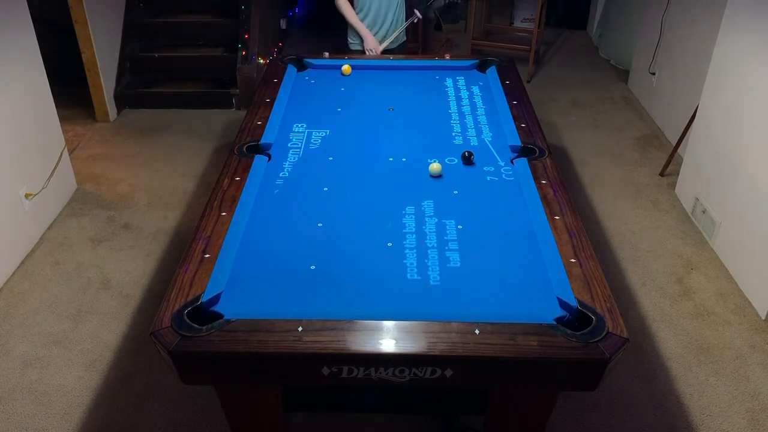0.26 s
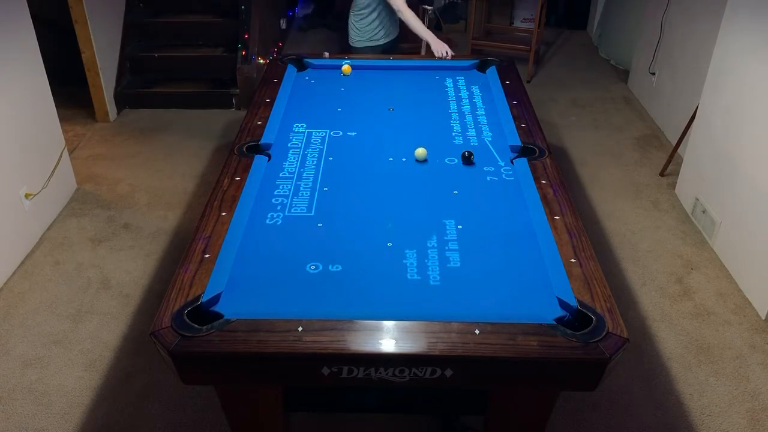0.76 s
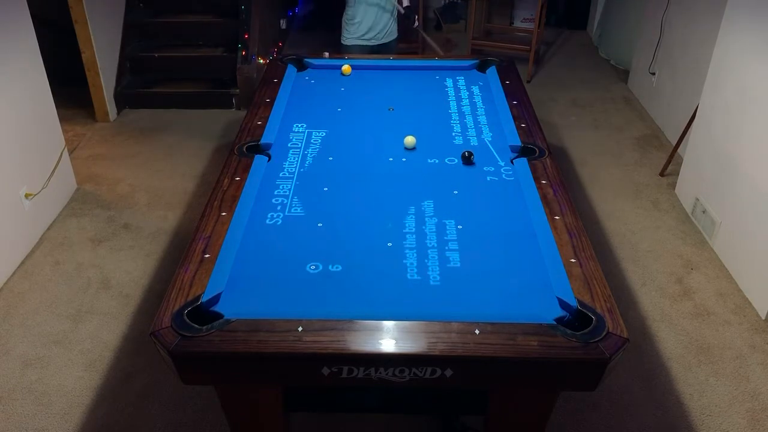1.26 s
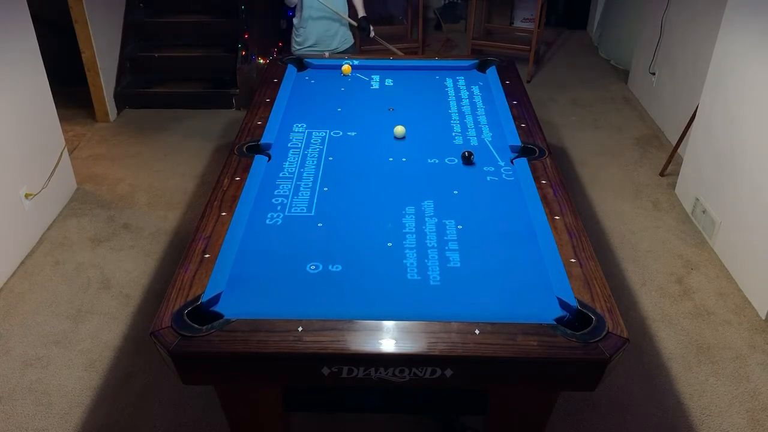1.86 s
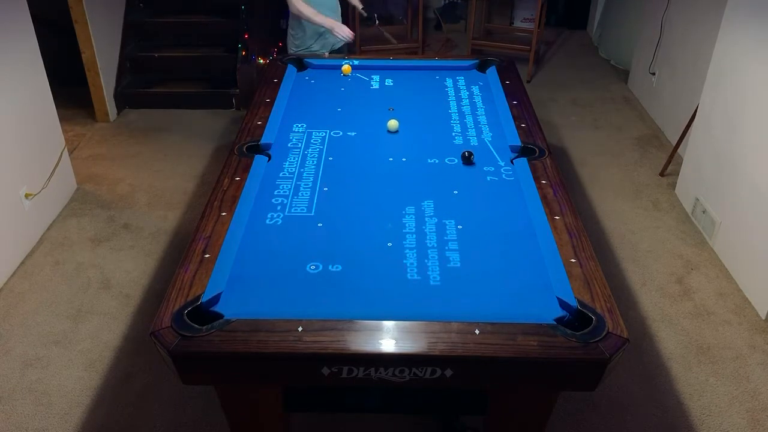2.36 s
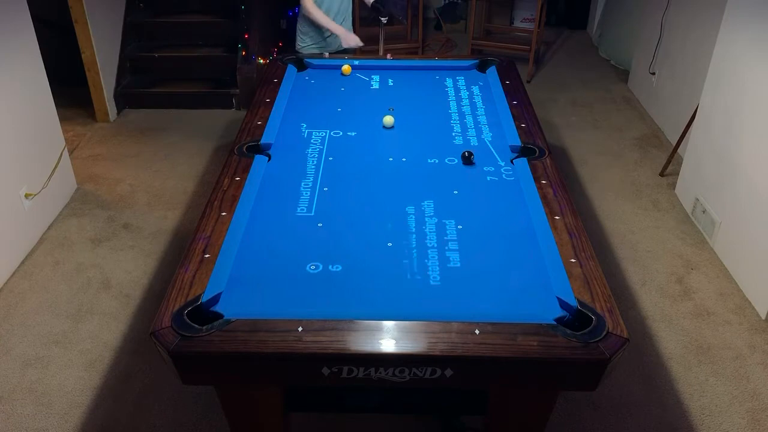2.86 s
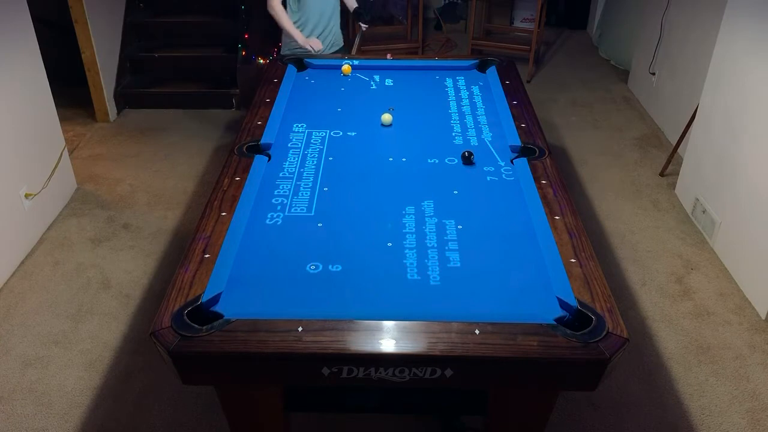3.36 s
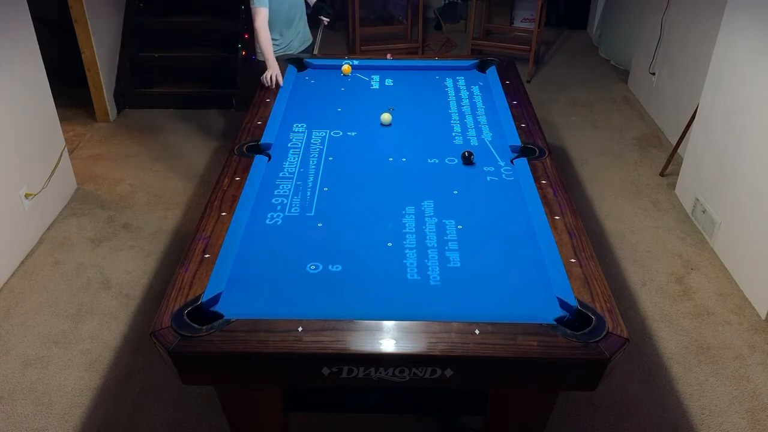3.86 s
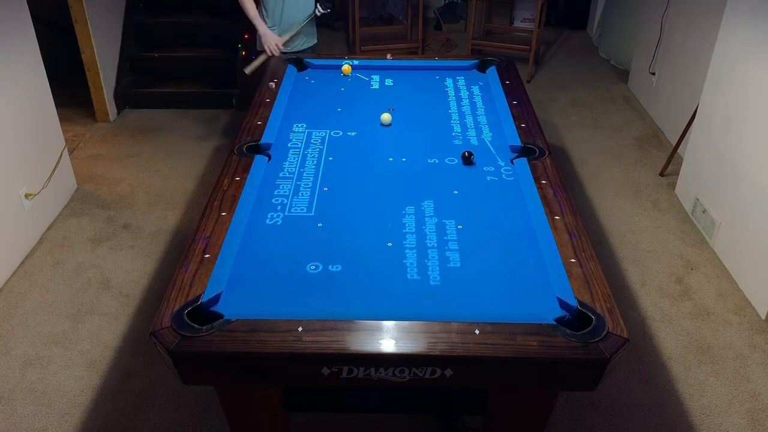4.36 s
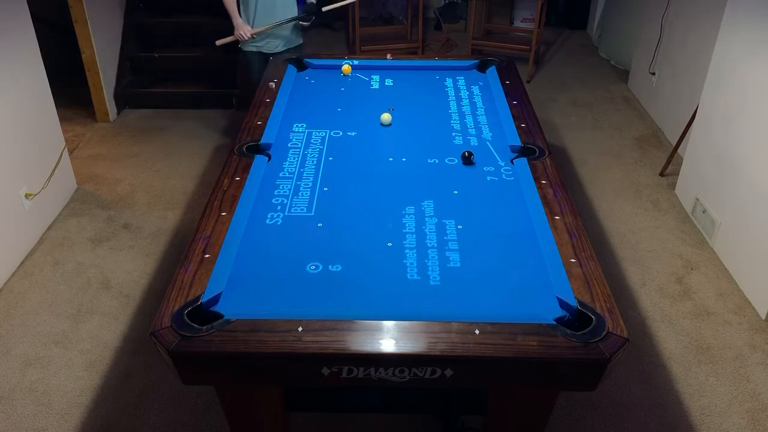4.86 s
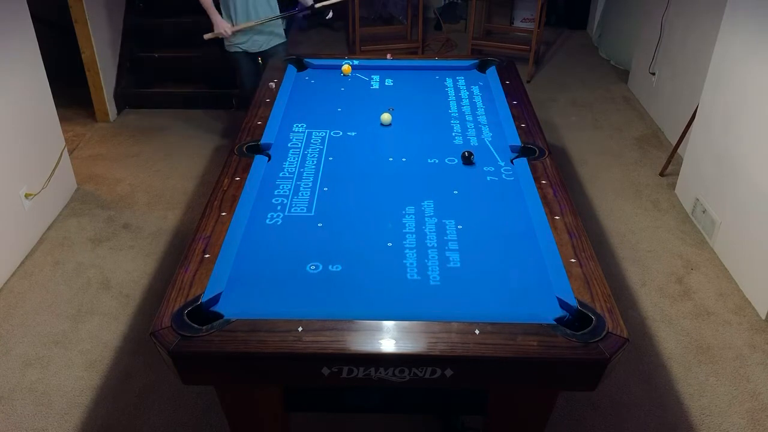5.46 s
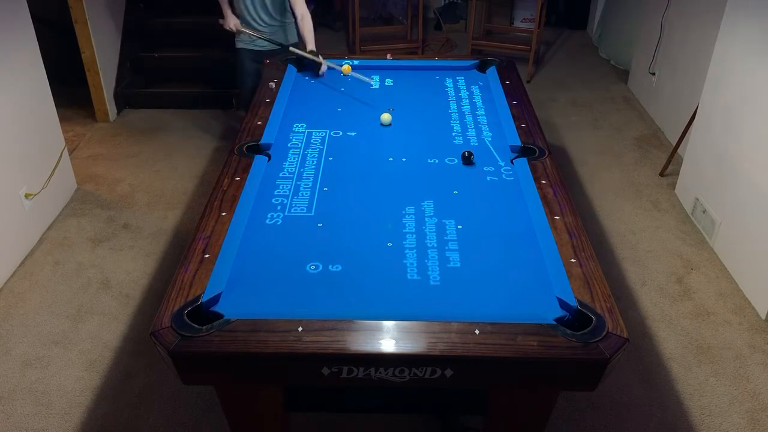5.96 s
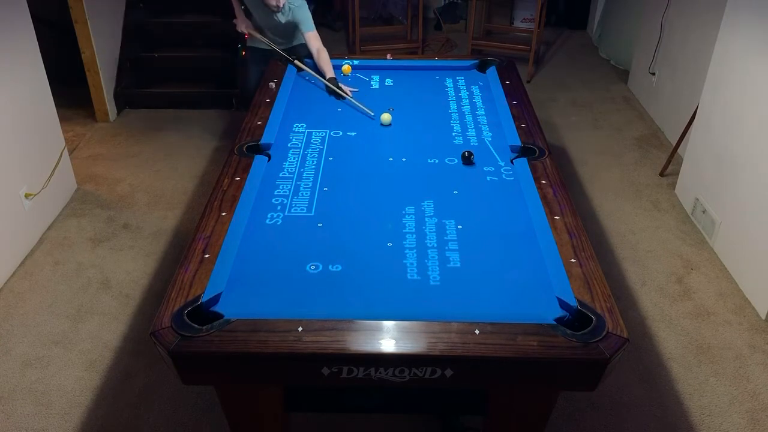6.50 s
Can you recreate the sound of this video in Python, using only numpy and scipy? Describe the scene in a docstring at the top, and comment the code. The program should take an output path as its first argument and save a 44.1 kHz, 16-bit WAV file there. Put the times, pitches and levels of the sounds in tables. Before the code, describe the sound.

A low, soft fan hum fills a small quiet room throughout. At 0 s a sharp clack opens a rapid, uneven clatter of a ball in a pocket until about 0.35 s, with hollow wooden booms and a wavering low drone; rumbling fades by 0.5 s. A padded footfall comes at 1.15 s, and low rolling swells gently from 1.3 to 1.9 s. Faint gritty chalk strokes scratch between 1.35 and 2.2 s, with a dull thud near 2.0 s and a step at 2.1 s. Chalk taps the wooden rail at 2.58 s. Slight cloth rustles follow, then steps at 3.8 s. A hand scuffs at 4.1 s before a cluster of heavy, muffled knocks from 4.28 to 4.5 s. Soft steps and small knocks lead to 5.7 s. From 6.17 s hand and arm thump onto the table, a cue hisses barely audibly, and a small tap ends it near 6.65 s.

```python
"""A quiet basement room with a pool table: a ball clatters into a pocket, rocks and rumbles on to a thud.
The player chalks his cue, sets the chalk on the rail, walks round, knocks about at the corner pocket
and leans on the table for the next shot, while a fan hums throughout.
Impacts are sums of damped modes with bursts of decaying noise; friction, rolling and air are coloured
noise; the rocking ball's drone and the fan add tones."""
import sys
import numpy as np
from scipy import signal
from scipy.fft import rfft, irfft, next_fast_len
from scipy.io import wavfile
from scipy.ndimage import uniform_filter1d

SR = 44100
rng = np.random.default_rng(int(sys.argv[2]) if len(sys.argv) > 2 else 0)


def unload_wav(signal):
    """Save mono or channel-first audio to the path in sys.argv[1] as 16-bit WAV at rate SR, clipped to [-1, 1]."""
    wavfile.write(
        sys.argv[1],
        SR,
        np.round(np.clip(np.atleast_2d(signal).T, -1, 1) * 32767).astype(np.int16),
    )


N = 296793
RING_TIME = np.arange(SR) / SR  # one second of time [s]

# Knocks on pocket and cabinet: (time [s], force level [dB], boom level [dB], ring centre [Hz],
# hardness corner [Hz], contacts [count, always 1])
KNOCK_CONTACTS = [(0.0, -23, -49, 705, 4935, 1), (0.013, -30, -14, 242, 1290, 1),
                  (0.034, -28, -21, 433, 1490, 1), (0.134, -34, -14.5, 810, 5560, 1),
                  (0.157, -25.5, -33.5, 628, 800, 1), (0.191, -29, -18, 592, 1300, 1),
                  (0.201, -33.5, -22, 567, 2700, 1), (0.231, -32.5, -29, 668, 700, 1),
                  (0.269, -39.5, -22, 502, 3570, 1), (0.297, -48.5, -29.5, 449, 3000, 1),
                  (0.317, -48.5, -37.5, 500, 3190, 1), (0.345, -42.5, -21.5, 490, 1100, 1),
                  (1.968, -34, -30.5, 560, 1230, 1), (1.987, -23, -21, 241, 620, 1),
                  (2.016, -29, -39, 181, 222, 1), (2.056, -34.5, -39, 188, 244, 1),
                  (3.897, -43.5, -57, 760, 620, 1), (4.109, -35, -41, 720, 700, 1),
                  (4.165, -32.5, -36.5, 338, 450, 1), (4.282, -21, -48, 770, 720, 1),
                  (4.292, -20.5, -21.5, 384, 560, 1), (4.328, -23.5, -32, 268.5, 307, 1),
                  (4.369, -24, -28.5, 427, 446, 1), (4.416, -25.5, -30, 386, 481, 1),
                  (4.431, -24.5, -22.5, 393, 336, 1), (4.465, -30.5, -29, 283, 803, 1),
                  (4.512, -32, -27.5, 427, 605, 1), (4.961, -36.5, -42, 284, 707, 1),
                  (5.665, -38.5, -24, 550, 470, 1), (5.703, -37.5, -36, 313, 350, 1)]
# Modes of the heavy frame: (frequency [Hz], relative level [dB], t60 [s])
FRAME_MODES = [(53.4, -14.5, 0.83), (65.7, -3.5, 0.68), (85.1, 9.5, 0.2), (102.6, -1.5, 0.36),
               (116.07, 5, 0.41), (137.9, 1.5, 0.21)]
# Modes of the pocket rim: (frequency [Hz], relative level [dB], t60 [s])
RIM_MODES = [(667, 15, 0.23), (719, -0.5, 0.067), (783, -2.5, 0.23), (908, -11, 0.12), (1007, -3, 0.2),
             (1080, 5.5, 0.17), (1226, -4, 0.21), (1432, -18, 0.16), (1510, -8, 0.25), (1634, -2.5, 0.25),
             (1690, -11.5, 0.32), (1893, -5, 0.31), (2070, -12.5, 0.2), (2190, -17, 0.37),
             (2300, -16, 0.24), (2660, -21.5, 0.2), (2870, -11.5, 0.31), (3220, -9.5, 0.24),
             (3380, -21, 0.2), (4230, -17, .25), (4520, -11.5, 0.31), (5000, -21.5, .22), (6050, -18, .2),
             (6700, -23.5, .2)]
# Likeness of the two channels: (frequency [Hz], correlation [-1 to 1])
CHANNEL_CORRELATION = [(60, 1), (150, 0.98), (300, 0.65), (700, 0.2), (1080, 0.42), (1600, -0.42),
                       (2300, 0.2), (6000, -0.23), (15000, 1)]


def amp(db):
    """Level definition: decibels to amplitude gain."""
    return 10 ** (np.asarray(db) / 20)


def unit(x):
    """Normalisation to an rms of 1."""
    return x / np.sqrt(np.mean(x ** 2) + 1e-20)


def read(points, hz):
    """Interpolation of a table over frequency, linear on a log axis."""
    f, value = np.transpose(points)
    return np.interp(np.log(hz + 1), np.log(f + 1), value)


def add(mix, s, sound):
    """Superposition: mixes a sound in at time s, in place."""
    part = mix[:, max(round(s * SR), 0):][:, :sound.shape[-1]]
    part += sound[..., :part.shape[1]]


def pitches(modes):
    """Modal frequencies, as a column."""
    return np.array(modes)[:, :1]


def hump_db(hz, centre_hz, octaves):
    """Broad spectral peak with nearly straight skirts on a log axis."""
    away = np.hypot(1, np.log2((hz + 1) / centre_hz) / octaves)
    return -20 * np.log10(away) - 6 * (away - 1)


def peaks_db(hz, peaks):
    """Resonant lift (Hz, width Hz, dB) of a spectrum; where peaks overlap the greatest lift counts."""
    return np.max([db / (1 + (2 * (hz - at) / width) ** 2) for at, width, db in peaks], axis=0)


def contact_db(hz, corner_hz, steepness):
    """Contact-time low-pass: a softer, longer contact excites less treble."""
    return -10 * np.log10(1 + (hz / corner_hz) ** steepness)


def envelope(length_s, attack_s, release_t60):
    """Linear attack, and exponential decay from length_s on."""
    return np.minimum(RING_TIME / attack_s, 1) * amp(-60 * np.maximum(RING_TIME - length_s, 0) / release_t60)


def noise(field_db, length, size=512):
    """Diffuse field: two partly correlated noises whose level is field_db(time, Hz)."""
    hop = size // 4
    hz = np.fft.rfftfreq(size, 1 / SR)
    t = np.arange(length // hop + 5)[:, None] * hop / SR
    shape = (2, len(t), len(hz))
    first, second = rng.standard_normal(shape) + 1j * rng.standard_normal(shape)
    alike = np.clip(read(CHANNEL_CORRELATION, hz), -1, 1)
    left_right = np.array([first, alike * first + np.sqrt(1 - alike ** 2) * second])
    spectrum = left_right * amp(field_db(t, hz))
    sound = signal.istft(spectrum, nperseg=size, noverlap=size - hop, time_axis=1, freq_axis=2)[1]
    return sound[:, :length]


def patches(t, hz):
    """Random modulation: blotches over time and frequency, rms 1."""
    over_time = uniform_filter1d(rng.standard_normal((len(t), len(hz))), size=5, axis=0)
    return unit(uniform_filter1d(over_time, size=12, axis=1))


def wander(length, span_s):
    """Low-passed noise: a smooth random curve of rms 1 that changes within span_s."""
    return unit(signal.oaconvolve(rng.standard_normal(length), np.hanning(round(span_s * SR)), "same"))


def burst(colour_db, early, early_s, rise_s, damping=0, uneven_db=4, uneven_above_hz=1500):
    """Reverberant decay: strong first arrivals, then an uneven noise tail, each band dying at its own rate."""
    # Room decay: (frequency [Hz], t60 without extra damping [s])
    room_t60 = [(60, 0.76), (250, 0.52), (1000, 0.3), (3000, 0.55), (7000, 0.33), (15000, 0.4)]
    time = RING_TIME[:SR * 2 // 3]

    def field_db(t, hz):
        uneven = uneven_db * rng.standard_normal(len(hz)) * hz / (hz + uneven_above_hz)
        return colour_db(hz) + uneven - t * (60 / read(room_t60, hz) + damping)

    tail = noise(field_db, len(time), size=1024)
    tail *= (1 + early * np.exp(-time / early_s)) * np.tanh(time / rise_s) ** 2
    return tail / np.sqrt(np.mean(tail[:, :SR // 40] ** 2))  # rms 1 over the first 25 ms


def ring(modes, rise_s, weight_db=0):
    """Modal superposition: damped sines, less in phase between channels where correlation is lower."""
    hz, db, t60 = np.transpose(modes)[:, :, None]
    order = np.arange(len(hz))[:, None]
    size = amp(db + weight_db)
    skew = np.arccos(np.clip(read(CHANNEL_CORRELATION, hz), -1, 1)) * (-1) ** order / 2
    sign = (-1) ** (order // 2)
    t = RING_TIME[:SR // 2]
    decay = sign * size / np.linalg.norm(size) * amp(-60 * t / t60) * np.tanh(t / rise_s) ** 2
    return 2 * np.array([(decay * np.sin(2 * np.pi * hz * t + side * skew)).sum(0) for side in (1, -1)])


def rub(colour_db, grain_db, length=SR, patchy_db=0):
    """Stick-slip friction or rolling: evened-out coloured noise, its level roughened by grain_db."""
    sound = noise(lambda t, hz: colour_db(hz) + patchy_db * patches(t, hz), length, size=1024)
    sound /= np.sqrt(uniform_filter1d((sound ** 2).mean(0), size=SR // 10) + 1e-20)
    return sound * amp(grain_db * wander(length, span_s=0.012))


def contacts(rows):
    """Contact hardness: the harder the contact, the more it clacks for its force."""
    clack_db, db_per_octave, middle_hz = -8.5, 3.5, 690
    for s, force_db, boom_db, centre_hz, hard_hz, _ in rows:
        clack = force_db + clack_db + db_per_octave * np.log2(hard_hz / middle_hz)
        yield s, force_db, boom_db, clack, centre_hz, hard_hz


def strike_spot(modes):
    """Modal participation: the spot struck favours some modes at random, in dB."""
    return 4 * rng.standard_normal((len(modes), 1))


def blows(rows, modes, clack_modes, boom_hz, ring_octaves, steepness, early, clack_share_db):
    """Impact excitation: each contact shakes the frame, rings the wood and clacks, most at the clack modes."""
    # Clack spectrum: (frequency [Hz], relative level [dB])
    clack_spectrum = [(40, -35), (150, 5), (300, 2), (700, 0.5), (1100, -2), (1400, -7), (2000, -8.5),
                      (2700, -17), (5000, -19.5), (7300, -18.5), (10500, -22.5), (12200, -31), (13200, -36),
                      (15000, -44.5)]
    peak_width_hz, peak_lift_db = 50, 3
    swell_s, swell_power, middle_hz = 0.0028, 0.7, 690  # swell_s is the rise at middle hardness
    woody = [(hz, peak_width_hz, peak_lift_db) for hz, _, _ in clack_modes]
    boom = ring(FRAME_MODES, 0.011, hump_db(pitches(FRAME_MODES), boom_hz, 0.85))
    out = np.zeros((2, N))
    for s, force_db, boom_db, clack_db, centre_hz, hard_hz in contacts(rows):
        add(out, s, amp(boom_db) * boom)

        weight_db = hump_db(pitches(modes), centre_hz, ring_octaves) + strike_spot(modes)
        add(out, s, amp(force_db) * ring(modes, 0.0046, weight_db))

        colour = lambda hz: read(clack_spectrum, hz) + peaks_db(hz, woody) + contact_db(hz, hard_hz, steepness)
        rise_s = swell_s * (middle_hz / hard_hz) ** swell_power  # softer contacts swell more slowly
        clack = burst(colour, early, early_s=0.039, rise_s=rise_s)
        add(out, s, amp(clack_db + clack_share_db) * clack)
    return out


def knocks():
    """Impacts on pocket and cabinet excite the cabinet's modes, with a clack coloured by the rim."""
    # Cabinet modes: (frequency [Hz], relative level [dB], t60 [s])
    cabinet_modes = [(142.2, 12, 0.39), (172.7, 1.5, 0.49), (219.5, 9.5, 0.3), (280.8, 10.5, 0.22),
                     (372, -2.5, 0.36), (397.4, 1, 0.29), (462.4, -2, 0.19), (485.3, -5.5, 0.17),
                     (524, -5.5, 0.61), (579, 0.5, 0.22), (683.4, -7, 0.18), (720, 4, 0.047),
                     (779, 12, 0.08), (945, -12.5, 0.73), (1044, -14, 0.45), (1196, -15, 0.35),
                     (1253, -8.5, 0.2)]
    return blows(KNOCK_CONTACTS, cabinet_modes, RIM_MODES, boom_hz=103, ring_octaves=0.58,
                 steepness=3.6, early=0.99, clack_share_db=0.1)


def pocket_rim():
    """Stiffness raises modal frequencies: the stiff rim rings above the cabinet at every knock."""
    out = np.zeros((2, N))
    for s, _, _, clack_db, _, hard_hz in contacts(KNOCK_CONTACTS):
        weight_db = contact_db(pitches(RIM_MODES), hard_hz, 4.7) + strike_spot(RIM_MODES)
        rim = ring(RIM_MODES, 0.00097, weight_db)
        level_db = clack_db + 1.0 + contact_db(1100, hard_hz, 2.9)  # soft contacts hardly ring it
        add(out, s, amp(level_db) * rim)
    return out


def drone():
    """Sustained resonance: a rocking ball keeps a cabinet mode near 220 Hz droning unevenly."""
    # Spells of rocking: (time [s], length [s], starting level [dB], settled pitch [Hz], roughness [0-1])
    rocking = [(0.0, 0.071, -18.5, 210, 0), (0.064, 0.058, -16.5, 223.4, 0.08),
               (0.147, 0.092, -16, 217.9, 0.1), (0.244, 0.12, -17.5, 217.9, 0.39),
               (0.387, 0.034, -20, 221.8, 0.1), (0.448, 0.038, -32, 228.5, 0.6),
               (2.008, 0.1, -30.5, 220.6, 0), (4.461, 0.047, -23.5, 217.6, 0.5),
               (4.526, 0.051, -29.5, 224.4, 0.5)]
    flat_hz, settle_s = 14.5, 0.024  # each spell starts flat and settles on its pitch
    sag_db_per_s = 10
    out = np.zeros((2, N))
    for s, length_s, db, pitch_hz, rough in rocking:
        hz = pitch_hz - flat_hz * np.exp(-RING_TIME / settle_s)
        tone = np.sqrt(2) * np.sin(2 * np.pi * np.cumsum(hz) / SR)
        grit = unit(noise(lambda t, f: hump_db(f, pitch_hz, 0.2), SR, size=2048))
        level = amp(db - sag_db_per_s * RING_TIME) * envelope(length_s, attack_s=0.012, release_t60=0.089)
        add(out, s, level * (tone + rough * grit))
    return out


def rolling():
    """Rolling contact noise: a ball rumbles through the table, swelling and fading until it stops."""
    # Course of the rumble: (time [s], level [dB])
    roll_levels = [(0, -19), (0.5, -43), (1.049, -58), (1.3, -36.5), (1.6, -39), (1.85, -36.5), (2.2, -63),
                   (2.6, -51.5), (3.1, -66)]
    # Rumble spectrum: (frequency [Hz], relative level [dB])
    rumble_spectrum = [(30, -35), (80, 1.5), (140, 3.5), (220, 0), (330, -11), (600, -16.5), (1000, -24),
                       (2000, -40), (4000, -68.5), (10000, -79)]
    s, db = np.transpose(roll_levels)
    level = amp(np.interp(np.arange(N) / SR, s, db, right=-np.inf))
    return level * rub(lambda hz: read(rumble_spectrum, hz), grain_db=0.2, length=N)


def fan():
    """Broadband flow noise, slightly patchy, with narrow-band tones that waver in level."""
    # Air noise spectrum: (frequency [Hz], relative level [dB])
    air_spectrum = [(20, -38.5), (38, -14.5), (70, -5), (141, -3.5), (196, -10.5), (232, -6.5),
                    (333, -19.5), (465, -17), (835, -27), (1070, -26.5), (1500, -35.5), (2000, -43.5),
                    (3400, -58.5), (10000, -64.5), (13000, -63.5), (15500, -82.5)]
    # Fan tones: (frequency [Hz], width at -6 dB [Hz], level [dB])
    fan_tones = [(113.8, 9.3, -50), (232.7, 11, -58), (1053, 60, -60), (1140, 120, -76.5)]
    air_db, air_patchy_db = -42.5, 0.6
    tone_waver_db, waver_s = 1.0, 0.07
    air_noise = noise(lambda t, hz: read(air_spectrum, hz) + air_patchy_db * patches(t, hz), N, size=4096)
    out = amp(air_db) * unit(air_noise)
    for tone_hz, width_hz, db in fan_tones:
        waver = amp(tone_waver_db * wander(N, waver_s))
        line_db = lambda t, hz: -20 * np.log10(1 + (2 * (hz - tone_hz) / width_hz) ** 2)
        out += amp(db) * unit(waver * noise(line_db, N, size=8192))
    return out


def clicks():
    """Short hard impacts as band-limited bursts; the chalk set down also rings the rail's modes."""
    # Small hard clicks: (time [s], level [dB], centre [Hz], width [octaves], extra damping [dB/s])
    click_contacts = [(0.839, -78, 4530, 0.6, 200), (2.578, -40.5, 930, 0.81, 40),
                      (2.578, -60.5, 5130, 0.5, -12), (3.785, -71, 7200, 0.3, 222.5),
                      (4.603, -60, 1980, 0.33, 46), (4.604, -68.5, 3810, 0.32, 71),
                      (4.634, -82.5, 3800, 0.45, 88)]
    # Chalk on the wooden rail: (time [s], level [dB])
    rail_tap = (2.577, -37)
    # Rail modes: (frequency [Hz], relative level [dB], t60 [s])
    rail_modes = [(411, -1, 0.88), (635, 6.5, 0.22), (760, 13.5, 0.15), (807, 12, 0.061), (1144, 3, 0.3),
                  (1250, 5.5, 0.17), (1407, 4.5, 0.26), (1680, -11, 0.14), (2090, -14, 0.74),
                  (2190, -24, 0.14), (2780, -10, 0.29), (3240, -12, 0.16), (3531, -2, 0.12),
                  (4030, -13, 0.21), (4600, -24, 0.18), (4930, -20, 0.18)]
    out = np.zeros((2, N))
    for s, db, centre_hz, octaves, damping in click_contacts:
        colour = lambda hz: hump_db(hz, centre_hz, octaves) + contact_db(hz, 5800, 3.6)
        add(out, s, amp(db) * burst(colour, early=0.86, early_s=0.008, rise_s=0.003, damping=damping))
    tap_s, tap_db = rail_tap
    add(out, tap_s, amp(tap_db) * ring(rail_modes, rise_s=0.0026))
    return out


def steps():
    """Soft impacts, heel then toe: each booms with the low frame modes and scuffs the carpet."""
    # Footfalls: (time [s], heel boom level [dB], heel scuff level [dB], heel to toe [s])
    footfalls = [(1.148, -28, -43, 0.024), (2.109, -22.5, -41, 0.056), (3.808, -32.5, -54, 0.043),
                 (3.901, -28, -43.5, 0.044), (4.611, -39.5, -42, 0.041), (4.722, -44, -59.5, 0.066)]
    # Carpet scuff spectrum: (frequency [Hz], relative level [dB])
    scuff_spectrum = [(30, -19.5), (100, 1), (280, 6), (380, -17), (540, -0.5), (900, -17), (2000, -30),
                      (6000, -76)]
    toe_boom_db, toe_scuff_db = -1, -4  # toe against heel
    out, boom = np.zeros((2, N)), ring(FRAME_MODES, rise_s=0.013)
    scuff = lambda: burst(lambda hz: read(scuff_spectrum, hz), early=1.0, early_s=0.023, rise_s=0.01)
    for s, boom_db, scuff_db, toe_s in footfalls:
        add(out, s, amp(boom_db) * boom)
        add(out, s, amp(scuff_db) * scuff())
        add(out, s + toe_s, amp(boom_db + toe_boom_db) * boom)
        add(out, s + toe_s, amp(scuff_db + toe_scuff_db) * scuff())
    return out


def chalk():
    """Stick-slip friction: gritty chalk strokes, coloured by resonances of cue tip and chalk cube."""
    # Strokes on the tip: (time [s], length [s], level [dB], centre [Hz], width [octaves])
    strokes = [(1.35, 0.036, -73.5, 4200, 0.36), (1.688, 0.12, -73, 5500, 2.6),
               (1.764, 0.046, -55, 3850, 0.59), (1.794, 0.15, -61, 1700, 1.75),
               (1.936, 0.25, -67, 3870, 2.1), (2.114, 0.045, -58, 6700, 0.38)]
    # Resonances of scraped tip and cube: (frequency [Hz], width [Hz], lift [dB])
    scrape_peaks = [(1890, 940, 15), (3160, 260, 9), (4240, 420, 6), (4500, 300, 5), (6150, 180, -3.5),
                    (6840, 460, -4), (10200, 300, 1.5)]
    out = np.zeros((2, N))
    for s, length_s, db, centre_hz, octaves in strokes:
        colour = lambda hz: (hump_db(hz, centre_hz, octaves) + peaks_db(hz, scrape_peaks)
                             + contact_db(hz, 10900, 22))
        grit = rub(colour, grain_db=3.0, patchy_db=2)
        add(out, s, amp(db) * envelope(length_s, attack_s=0.031, release_t60=0.22) * grit)
    return out


def sleeve():
    """Fibre friction: cloth brushes faintly, as patchy treble noise, when the arm moves."""
    # Rustles: (time [s], length [s], level [dB], centre [Hz])
    rustles = [(3.066, 0.049, -62, 10200), (3.191, 0.048, -69.5, 7300), (3.617, 0.066, -73, 7050),
               (6.154, 0.5, -78, 7500)]
    out = np.zeros((2, N))
    for s, length_s, db, centre_hz in rustles:
        cloth = rub(lambda hz: hump_db(hz, centre_hz, 0.78), grain_db=1.0, patchy_db=6.0)
        add(out, s, amp(db) * envelope(length_s, attack_s=0.042, release_t60=0.25) * cloth)
    return out


def weight_shifts():
    """Structure-borne rumble: floor and table frame sound deeply under shifting weight."""
    # Shifts of weight: (time [s], length [s], level [dB])
    shifts = [(3.807, 0.28, -41), (4.285, 0.46, -35), (4.419, 0.094, -36.5), (6.199, 0.07, -40)]
    out = np.zeros((2, N))
    for s, length_s, db in shifts:
        rumble = rub(lambda hz: hump_db(hz, 76, 0.49) + contact_db(hz, 110, 6.5), grain_db=0.5)
        add(out, s, amp(db) * envelope(length_s, attack_s=0.035, release_t60=0.82) * rumble)
    return out


def drags():
    """Sliding friction: a hand drags along the rail by the pocket with a dull scuff."""
    # Drags: (time [s], length [s], level [dB])
    hand_drags = [(4.112, 0.1, -37.5), (4.213, 0.065, -41.5)]
    # Spectrum of skin on the rail: (frequency [Hz], relative level [dB])
    skin_spectrum = [(100, -17.5), (250, 4.5), (400, -2.5), (590, 2), (800, -7), (1100, -16.5), (1400, -35),
                     (2500, -50.5), (6000, -68.5)]
    out = np.zeros((2, N))
    for s, length_s, db in hand_drags:
        scuff = rub(lambda hz: read(skin_spectrum, hz), grain_db=1.3)
        add(out, s, amp(db) * envelope(length_s, attack_s=0.03, release_t60=0.14) * scuff)
    return out


def leans():
    """Soft impacts: hand and arm land on the playing surface and excite its modes."""
    # Landings: (time [s], force level [dB], boom level [dB], ring centre [Hz], hardness corner [Hz],
    # contacts [count, always 1])
    landings = [(6.166, -23.5, -37.5, 304, 507, 1), (6.181, -21, -23, 493, 530, 1),
                (6.222, -22.5, -26.5, 636, 587, 1), (6.243, -19.5, -24, 247.4, 470, 1),
                (6.295, -27.5, -27, 270, 327, 1), (6.36, -35, -47.5, 303, 262, 1),
                (6.633, -48, -51, 900, 1390, 1), (6.646, -34.5, -34, 191, 600, 1)]
    # Playing-surface modes: (frequency [Hz], relative level [dB], t60 [s])
    bed_modes = [(204.3, 9.5, 0.18), (253.3, -2.5, 0.36), (279.8, 1.5, 0.29), (312.7, 3.5, 0.49),
                 (347.7, 3.5, 0.24), (481, -11.5, 0.26), (527.5, 7.5, 0.18), (652, 0.5, 0.064),
                 (752, 1.5, 0.11), (920, -19, 0.099), (994, -9, 0.39)]
    return blows(landings, bed_modes, bed_modes, boom_hz=131, ring_octaves=0.51,
                 steepness=4.45, early=0.52, clack_share_db=1)


def cue():
    """Smooth sliding friction: the shaft hisses over the bridge hand without grain."""
    # Slides: (time [s], length [s], level [dB])
    slides = [(6.21, 0.64, -72.5), (6.625, 0.037, -48)]
    out = np.zeros((2, N))
    for s, length_s, db in slides:
        slide = rub(lambda hz: hump_db(hz, 1500, 0.94) + contact_db(hz, 2100, 12.5), grain_db=0.0)
        add(out, s, amp(db) * envelope(length_s, attack_s=0.011, release_t60=0.42) * slide)
    return out


def scene():
    """Linear superposition of table, player and room."""
    table = knocks() + pocket_rim() + drone() + rolling()
    player = clicks() + steps() + chalk() + sleeve() + weight_shifts() + drags() + leans() + cue()
    return table + fan() + player


def record(dry):
    """Stereo colouring: sides differ in level and phase, their sum is dulled near 8.7 kHz, the band is limited."""
    # Level balance: (frequency [Hz], left minus right [dB])
    balance = [(60, -1), (350, -1.6), (1000, 0.5), (2500, -0.5), (5000, -2), (12000, -0.5)]
    # Phase difference: (frequency [Hz], lead of left over right [rad])
    left_lead = [(60, -0.19), (215, 0.62), (330, -0.47), (550, 0.5), (1080, 1), (1700, -0.48), (2400, 0.99),
                 (4000, -0.17)]
    edge_hz = 15700
    size = next_fast_len(N + SR // 4)
    hz, spectrum = np.fft.rfftfreq(size, 1 / SR), rfft(dry, size)
    half = amp(read(balance, hz) / 2) * np.exp(0.5j * read(left_lead, hz))
    bass_cut = 1 - np.exp(-(hz / 37) ** 4)
    spectrum = spectrum * np.array([half, 1 / half]) * bass_cut
    spectrum = spectrum - spectrum.mean(0) * np.exp(-((hz - 8700) / 900) ** 2)  # dulls the sum
    fade_out = np.minimum(np.arange(N)[::-1] / 200, 1) ** 2
    pair = irfft(spectrum, size)[:, :N] * fade_out
    low_pass = signal.firwin(511, edge_hz, window=("kaiser", 9), fs=SR)
    return signal.oaconvolve(pair, low_pass[None], "same")


dry = scene()
out = record(dry)
unload_wav(out)
```